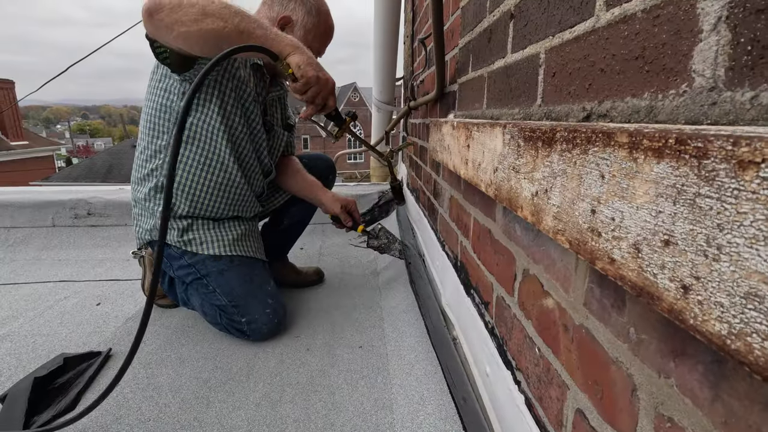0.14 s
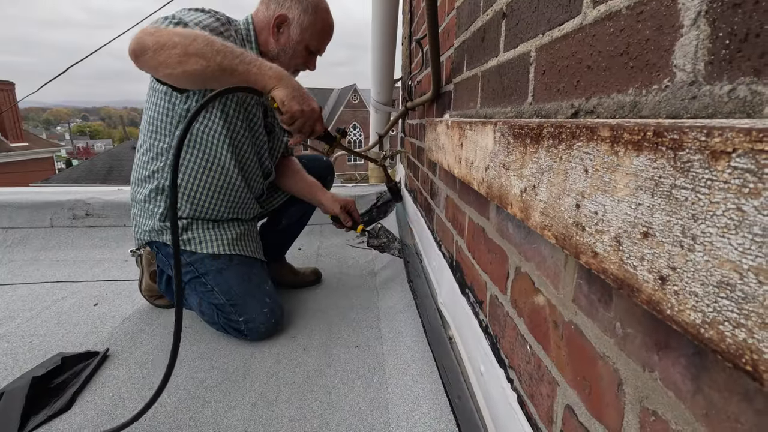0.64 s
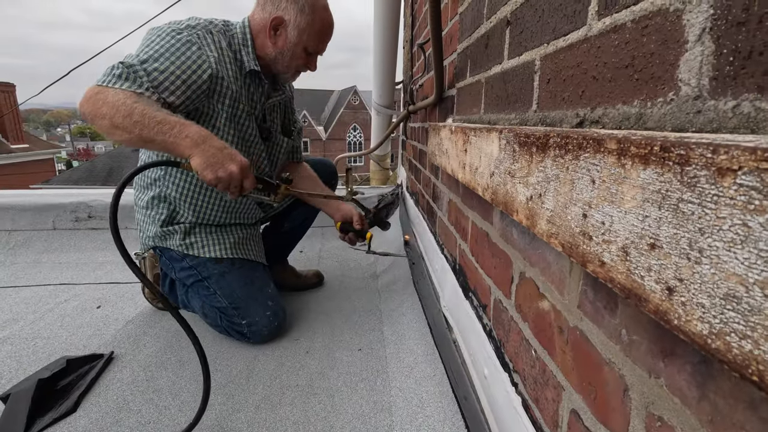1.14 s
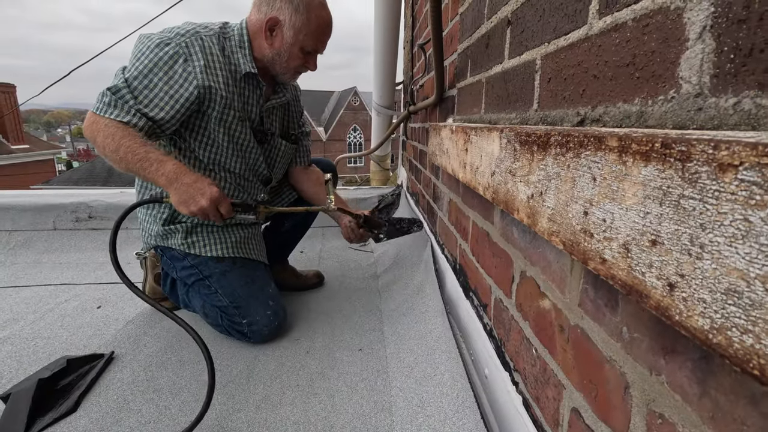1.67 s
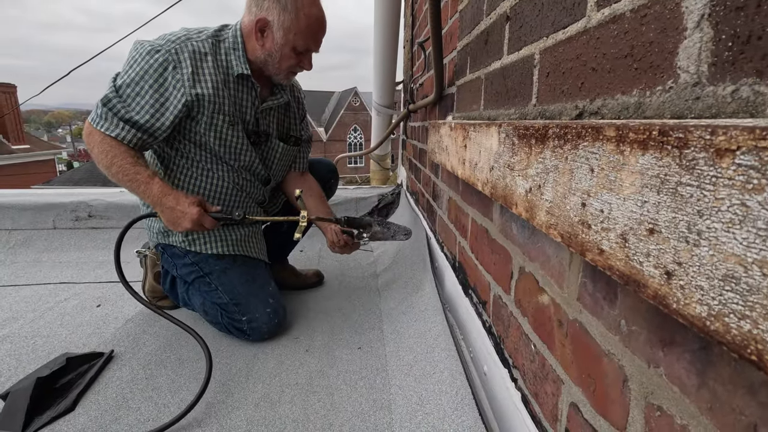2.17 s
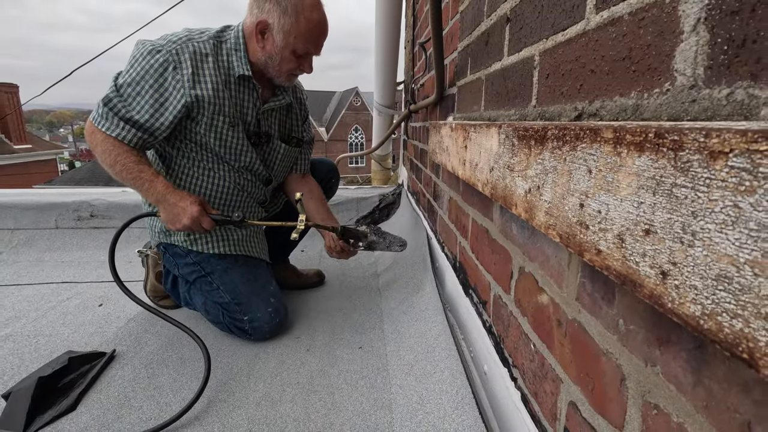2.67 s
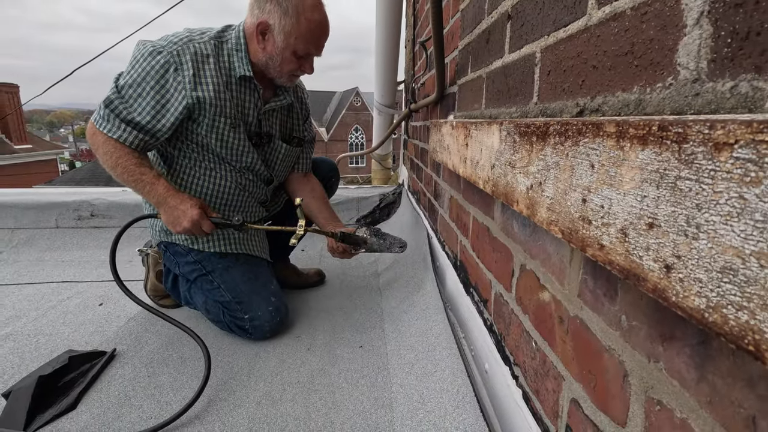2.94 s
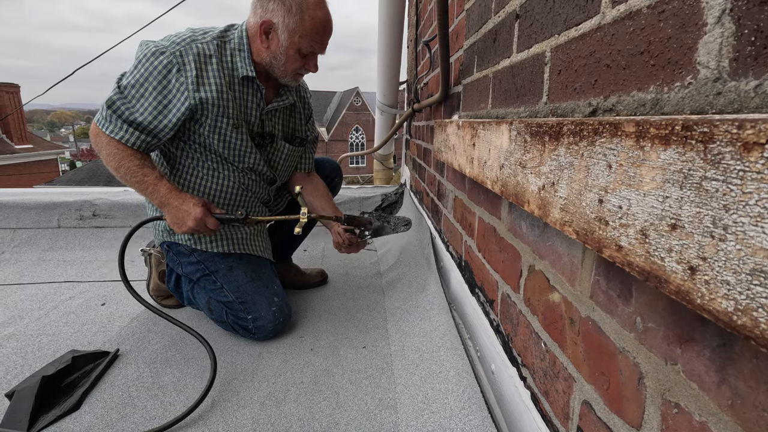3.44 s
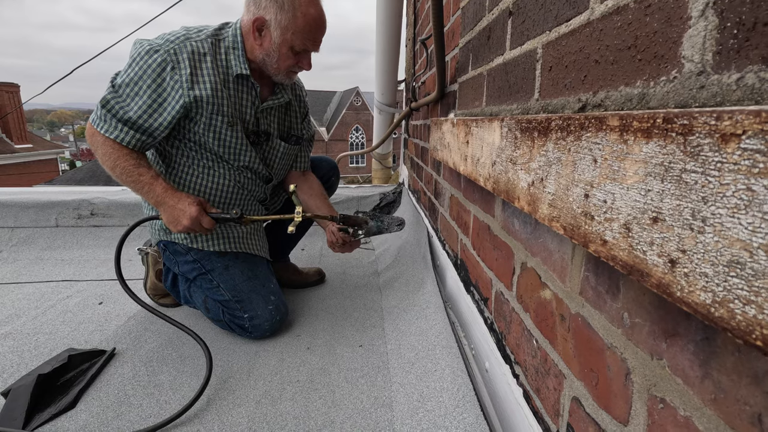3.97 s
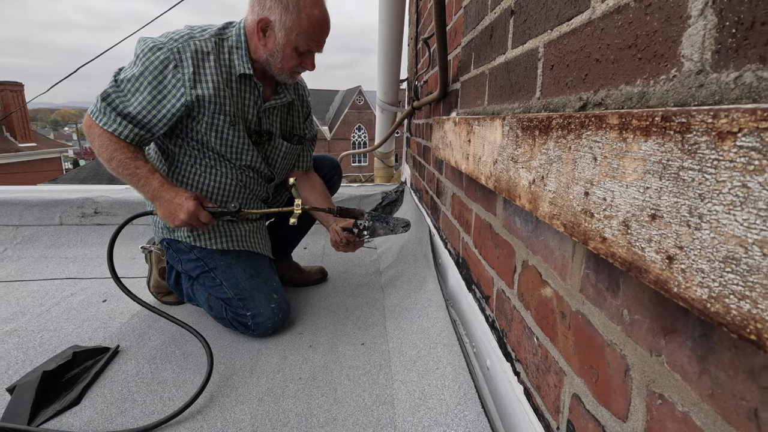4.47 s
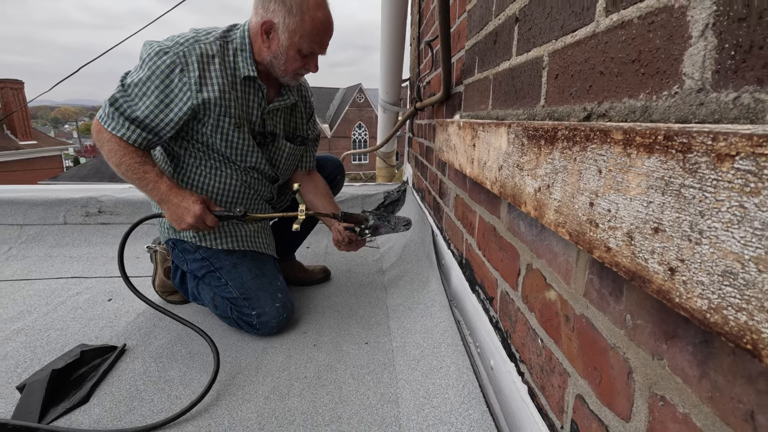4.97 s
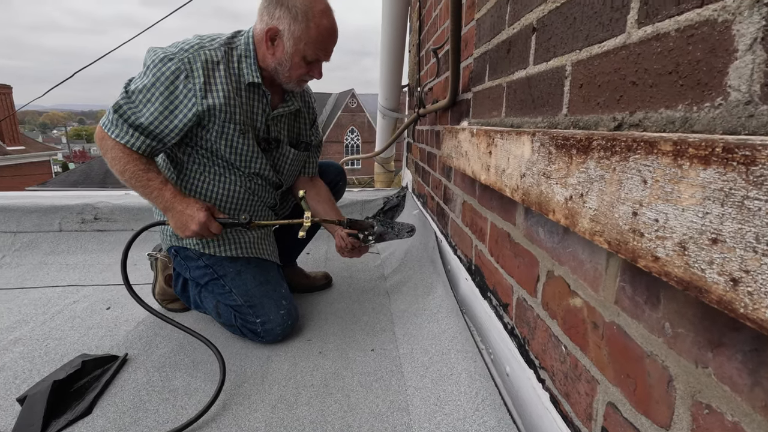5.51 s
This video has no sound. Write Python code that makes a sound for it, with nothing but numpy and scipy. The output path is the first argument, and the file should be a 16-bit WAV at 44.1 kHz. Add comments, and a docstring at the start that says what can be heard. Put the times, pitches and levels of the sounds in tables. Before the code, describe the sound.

On an open roof beside brick, a gas torch blasts a dense, turbulent rush with little hiss on top. The lever is released and the roar sinks away to a faint flicker; light metallic ticks follow. At about 2.3 seconds it catches suddenly, with a low swell, and burns steadily with more airy hiss and brief spits. Two well-separated microphones place it nearer the right, with no long reverberation.

```python
"""Propane torch on a flat roof

A torch roars beside a brick wall; the lever is let go, a pilot flame idles, the lever is squeezed again.
Noise swelling with random eddies makes roar and jet hiss, ringing scratches the ticks, noise puffs the spits.
Two microphones more than a metre apart hear it, the right one nearer; wall, roof and worker throw
short echoes that change as the torch moves.
"""
import sys
import numpy as np
from scipy import signal
from scipy.fft import rfft, irfft, next_fast_len
from scipy.io import wavfile
from scipy.ndimage import uniform_filter1d, map_coordinates

SR = 44100
rng = np.random.default_rng(int(sys.argv[2]) if len(sys.argv) > 2 else 0)


def ratio(d):
    """dB to gain"""
    e = np.asarray(d, float) / 20
    return 10 ** e


def dump(signal):
    """Clip the signal to [-1, 1] and save it as 16-bit WAV at the path in sys.argv[1]."""
    limited = np.clip(np.atleast_2d(signal).T, -1, 1)
    pcm = np.round(limited * 32767).astype(np.int16)
    wavfile.write(sys.argv[1], SR, pcm)


N = 247837
SIZE = next_fast_len(N)
HZ = np.fft.rfftfreq(SIZE, 1 / SR)
TIME = np.arange(N) / SR
SPLIT_HZ = 6100  # roar below, hiss above


def evened(x):
    """Scales to rms 1."""
    return x / np.sqrt(np.mean(abs(x) ** 2) + 1e-20)


def read(points):
    """Reads a (frequency, value) curve at every spectrum bin, along log frequency."""
    f, value = np.transpose(points)
    return np.interp(np.log(HZ + 1), np.log(f + 1), value)


# Full flame as the torch swings down and turns: (time [s], left roar level [dB], right roar level [dB],
# left jet hiss level [dB], right jet hiss level [dB])
FULL_FLAME = [(0, -20.5, -13, -49, -43.5), (.2, -19.5, -12, -42, -42), (.45, -24, -12.5, -47, -37.5),
              (.62, -23, -13, -50, -45.5), (0.901, -21, -13, -49, -42.5), (1.3, -19.5, -13, -51.5, -42.5),
              (1.5, -19, -12.5, -55, -53), (2.3, -19.5, -13.5, -42, -40.5), (2.67, -18, -12, -36.5, -36.5),
              (3.1, -19, -13.5, -40.5, -39.5), (3.7, -18.5, -12, -38.5, -37), (4.1, -19, -13.5, -42.5, -45),
              (4.602, -18, -13.5, -43.5, -51), (4.88, -20.5, -16, -41, -43), (5.1, -19.5, -16, -42.5, -52),
              (5.62, -22, -18, -41, -53)]
# Pilot flame: (left roar level [dB], right roar level [dB], left hiss level [dB], right hiss level [dB])
PILOT_LEVELS = [-51.5, -46, -84, -78.5]
# Flame colour at the farther and the nearer microphone: (frequency [Hz], relative level per Hz [dB])
COLOUR_LEFT = [(25, -38), (50, -16), (90, -9), (150, 3), (260, 4), (430, 5.5), (700, -2), (1300, -9),
               (2100, -19), (3500, -20), (6500, -29), (9000, -24), (12000, -35.5), (14000, -34),
               (15600, -47)]
COLOUR_RIGHT = [(25, -13), (50, -52), (90, -11.5), (150, 0), (260, 0.5), (430, -0.5), (700, -4.5),
                (1300, -13.5), (2100, -19.5), (3500, -31.5), (6500, -37), (9000, -36), (12000, -42),
                (14000, -47), (15600, -66)]
# Aim at each microphone, a row per hold: (roar tilt [dB/octave], hiss tilt [dB/octave],
# boost of first, second and third tube mode [dB])
AIM_AT_LEFT = [(-1.3, 2, -1, 14, 1), (-0.5, 6, -3, 13, -6), (-0.7, -3, -8, 10.3, -16), (-3, 4, 2, 8, -3),
               (-0.4, 2.2, 5, 7.2, 1), (1.25, 11.5, 2, 6.1, 7), (0.54, 7.5, 2.5, 9.9, 0),
               (1.5, 6, 14, 10, 15.5)]
AIM_AT_RIGHT = [(0.78, 2, 8.5, 7.4, -6), (0.39, -10, 7, 7.4, 10), (0.012, -8, -1.5, 9.6, 4),
                (-0.79, -14, 3.5, 7.4, -38), (0.15, -2, 10.5, 4.2, 6), (0.67, 3, 6.5, 11.6, 0),
                (0.28, -1, 8.5, 10, 4), (1.46, 7, 10, 6.3, -9)]
# Echoes off wall, roof and worker: (delay raised [ms], gain raised [ratio], delay lowered [ms],
# gain lowered [ratio])
WALL_ROOF_LEFT = [(.35, -0.26, 0.28, -0.19), (.68, 0.28, 0.523, 0.1), (1.3, -0.01, 1.616, 0.13),
                  (1.92, -0.22, 1.82, -0.27), (2.59, -0.37, 2.51, -0.17), (3.2, -0.061, 3.32, -0.3),
                  (4.44, 0.28, 4.4, 0.067), (6.53, -0.38, 6.8, -0.21)]
# The same on the near side: (delay raised [ms], gain raised [ratio], delay halfway [ms],
# gain halfway [ratio], delay lowered [ms], gain lowered [ratio])
WALL_ROOF_RIGHT = [(.36, 0.89, 0.4, 0.5, 0.37, -0.16), (.68, 0.23, 0.67, 0.43, 0.772, 0.56),
                   (1.02, -0.22, 0.926, -0.051, .95, 0.04), (1.36, -0.12, 1.62, -0.27, 1.414, 0.28),
                   (2.15, -0.33, 2.2, -0.34, 1.764, -.14), (2.8, 0.2, 2.73, 0.29, 2.64, 0.1),
                   (3.5, -0.31, 3.7, -0.3, 3.9, 0.14), (3.85, -0.18, 4.2, -0.13, 4.47, -0.22),
                   (4.9, 0.23, 4.92, 0.057, 5.3, 0.13)]
SINK_BEND, CATCH_BEND = (1.9, 1.25), (3.5, 2.2)  # powers of time for (roar, hiss)
HISS_LEAD_S = 0.0064  # squeezed again, the gas hisses a moment before it roars


def flame():
    """Burning roar below, hiss of the gas jet above, each following the lever down to the pilot and back."""
    s, *columns = np.transpose(FULL_FLAME)
    full_db = np.array([np.interp(TIME, s, column) for column in columns])
    roar_left, roar_right = turbulence(slow_db=0.65, slow_hz=1.4, fast_db=1.67, fast_hz=120, eddy_hz=1330)
    hiss_left, hiss_right = turbulence(slow_db=0.4, slow_hz=6, fast_db=1.2, fast_hz=90, eddy_hz=9500)
    left = held(roar_left, hiss_left, COLOUR_LEFT, AIM_AT_LEFT, WALL_ROOF_LEFT)
    right = held(roar_right, hiss_right, COLOUR_RIGHT, AIM_AT_RIGHT, WALL_ROOF_RIGHT)
    # the pilot flickers, its roar less than its hiss
    flicker_db = 2.5 * flutter(6)[:N] * np.array([[0.4], [0.4], [1], [1]])
    pilot_db = np.c_[PILOT_LEVELS] + flicker_db
    sunk = [lever(*bends) for bends in zip(SINK_BEND, CATCH_BEND, (0, HISS_LEAD_S))]
    sunk = np.repeat(sunk, 2, axis=0)
    gains = ratio(full_db + sunk * (pilot_db - full_db))
    return np.array([(gains[0::2] * left).sum(0), (gains[1::2] * right).sum(0)])


LET_GO_S, SINKING_S = 1.484, 0.31  # lever released, time until only the pilot burns
SQUEEZE_S, CATCHING_S = 2.281, 0.043  # lever squeezed, time until the flame is full


def lever(sink_bend, catch_bend, lead_s=0):
    """How far the flame has sunk to the pilot, 0-1, as the lever shuts and reopens the gas."""
    sinking = np.clip((TIME - LET_GO_S) / SINKING_S, 0, 1) ** sink_bend
    waiting = np.clip(1 - (TIME + lead_s - SQUEEZE_S) / CATCHING_S, 0, 1) ** catch_bend
    return sinking * waiting


# Ways of holding the torch: (start [s], end [s], lowered [0-1], tube pitch [ratio], left side lag [ms])
HOLD_POSES = [(.1, .35, 0.03, 1.05, 3.63), (.55, .8, 0, 1.003, 3.62), (1.0, 1.15, 0.56, 0.95, 3.7),
              (1.35, 1.52, 0.57, 0.91, 3.77), (1.78, 2.25, 0.82, 1.04, 3.67),
              (2.32, 3.4, 0.86, 0.983, 3.68), (3.6, 4.6, 0.9, .97, 3.58), (5.0, 5.5, 1, 1.007, 3.63)]
# Upper roar against the rumble: (time [s], relative level [dB])
RUSH_BALANCE = [(0, -1.2), (.4, 3.5), (.8, -1.2), (1.3, 1.8), (2.0, -2), (2.5, 0), (3.2, -1.7), (3.6, 1.5),
                (4.0, -1.5), (4.6, 0), (5.1, -2), (5.35, 2.5), (5.62, 0.5)]


def held(roar, hiss, colour, aims, echo_table):
    """Roar and hiss at one microphone, fading from hold to hold as the torch moves."""
    low = 1 / np.sqrt(1 + (HZ / SPLIT_HZ) ** 40)
    high = np.sqrt(1 - low ** 2)
    hold_s = np.ravel([hold[:2] for hold in HOLD_POSES])
    layers = np.zeros((2, N))
    for hold, aim, row in zip(HOLD_POSES, aims, np.eye(len(HOLD_POSES))):
        way = path(colour, hold, aim, echo_table)
        spectra = np.array([roar * evened(low * way), hiss * evened(high * way)])
        fade = np.interp(TIME, hold_s, np.repeat(row, 2))
        layers += fade * irfft(spectra, SIZE)[:, :N]
    burning, jet = layers
    return lit(burning), patchy(jet, 2.96)


def lit(burning):
    """Balances rumble and upper roar while the flame dies, idles and lights again with a whoomp."""
    rumble = irfft(rfft(burning, SIZE) / (1 + (HZ / 1200) ** 4), SIZE)[:N]
    rush = burning - rumble
    # the slowing jet loses its upper roar first
    dying = np.sin(np.pi * np.clip((TIME - LET_GO_S) / (1.3 * SINKING_S), 0, 1)) ** 2
    rush_db = np.interp(TIME, *np.transpose(RUSH_BALANCE)) - 6.5 * dying
    # the gathered gas lights: a swell of the rumble
    after = TIME - 2.35
    whoomp_db = 4.5 * np.exp(-(after / np.where(after < 0, 0.022, 0.055)) ** 2)  # rise and fade [s]
    # the small flame loses three quarters of its depth below 96 Hz
    depth = irfft(rfft(rumble, SIZE) / (1 + (HZ / 96) ** 4), SIZE)[:N]
    rumble = rumble - 0.75 * lever(SINK_BEND[0], CATCH_BEND[0]) * depth
    return evened(ratio(whoomp_db) * rumble + ratio(rush_db) * patchy(rush, 1.8) * rush.std())


# Burner tube modes: (frequency [Hz], half width [Hz])
TUBE_MODES = [(2650, 257), (5240, 600), (7780, 140)]


def path(colour, hold, aim, echo_table):
    """Spectrum of flame colour, tube modes and echoes for one way of holding the torch."""
    lowered, tube_pitch = hold[2:4]
    roar_tilt_db, hiss_tilt_db, *modes_db = aim
    db = read(colour) + roar_tilt_db * np.log2(1 + np.minimum(HZ, SPLIT_HZ) / 500)
    db += hiss_tilt_db * np.log2(np.maximum(HZ / SPLIT_HZ, 1))
    for (hz, width), peak_db in zip(TUBE_MODES, modes_db):
        db += peak_db / (1 + ((HZ - tube_pitch * hz) / width) ** 2)
    coarse = HZ[::25]
    echoes = np.zeros(len(coarse), complex)
    for row in echo_table:
        heights = np.linspace(0, 1, len(row) // 2)  # raised to lowered
        ms = np.interp(lowered, heights, row[0::2])
        gain = np.interp(lowered, heights, row[1::2])
        echoes += gain * np.exp(-2j * np.pi * coarse * ms / 1000)
    dull = 1 / (1 + (HZ / 5000) ** 2)  # rough brick and clothing scatter the treble
    return ratio(db) * (1 + dull * np.interp(HZ, coarse, echoes))


# Likeness of the two sides: (frequency [Hz], share of the sound common to both [0-1])
SIDES_ALIKE = [(40, .55), (90, .99), (300, .96), (1000, .9), (3000, .7), (6000, .45), (15000, .2)]


def turbulence(slow_db, slow_hz, fast_db, fast_hz, eddy_hz):
    """Noise whose strength lurches with the eddies, as left and right spectra that are partly alike."""
    noise = rng.standard_normal((2, SIZE))
    swell_db = slow_db * flutter(slow_hz)
    large = rfft(noise * ratio(swell_db + fast_db * flutter(fast_hz)))
    small = rfft(noise * ratio(swell_db + fast_db * flutter(fast_hz)))
    below = 1 / (1 + (HZ / eddy_hz) ** 4)  # large eddies sound low, small ones high
    right, other = below * large + (1 - below) * small
    share = read(SIDES_ALIKE)
    return share * right + np.sqrt(1 - share ** 2) * other, right


def flutter(top_hz):
    """Random wobble of rms 1, mostly slower than top_hz."""
    shape = HZ / (HZ + 2) / (1 + (HZ / top_hz) ** 2)
    return evened(irfft(rfft(rng.standard_normal(SIZE)) * shape, SIZE))


def patchy(x, patchy_db):
    """Makes a sound flicker in small patches of pitch and time, then scales it to rms 1."""
    z = signal.stft(x, nperseg=512, noverlap=384)[2]
    patches = uniform_filter1d(rng.standard_normal(z.shape), 10, 0)  # across pitch
    patches = uniform_filter1d(patches, 18, 1)  # across time
    flickering = z * ratio(patchy_db * evened(patches))
    return evened(signal.istft(flickering, nperseg=512, noverlap=384)[1][:N])


# Small ticks of lever and brass: (time [s], peak level [dB], left minus right [dB])
LEVER_TICKS = [(1.8431, -59, -9.0), (1.8945, -48, -2), (1.987, -46.5, 0), (2.0591, -50, -4),
               (2.0945, -45, -1.0), (2.153, -55, -5), (2.2317, -45.5, -8), (2.2631, -40, -14)]
# Ringing of the brass: (frequency [Hz], relative level [dB], 60 dB decay time [s])
BRASS_MODES = [(1440, 5, 0.018), (2790, 6, 0.0093), (3920, -11, 0.009), (5660, -7, 0.019),
               (8700, -15, 0.013)]


def ticks():
    """A short soft scratch rings the brass, each mode a decaying sine."""
    t = np.arange(3000) / SR
    ring = sum(ratio(db - 60 * t / t60) * np.sin(2 * np.pi * hz * t) for hz, db, t60 in BRASS_MODES)
    scratches = rng.standard_normal((len(LEVER_TICKS), 3000)) * t * np.exp(-t / 0.0053)
    return place(LEVER_TICKS, signal.fftconvolve(scratches, ring[None], axes=1))


# Brief spits of the jet: (time [s], peak level [dB], left minus right [dB])
JET_SPITS = [(3.2126, -29, -1.0), (4.3199, -29, -10), (5.0103, -51, -10)]


def spits():
    """Short puffs of high hiss: noise that swells and fades, kept to a treble band."""
    t = np.arange(4000) / SR
    puffs = rng.standard_normal((len(JET_SPITS), 4000)) * t * np.exp(-t / 0.014)
    band = signal.butter(3, [7000, 13500], "band", fs=SR, output="sos")
    return place(JET_SPITS, signal.sosfilt(band, puffs))


def place(events, sounds):
    """Starts one sound at each event, its peak set to the level and split by the balance."""
    out = np.zeros((2, N))
    for (s, db, pan_db), sound in zip(events, sounds):
        at = round(s * SR)
        gains = ratio([[db + pan_db / 2], [db - pan_db / 2]])
        out[:, at:at + len(sound)] += gains * sound / abs(sound).max()
    return out


def scene():
    """All sources; the farther left side hears them later, by a lag that drifts with the hold."""
    left, right = flame() + ticks() + spits()
    hold_s = np.ravel([hold[:2] for hold in HOLD_POSES])
    lag_ms = np.interp(TIME, hold_s, np.repeat([hold[4] for hold in HOLD_POSES], 2))
    heard_at = np.arange(N) - lag_ms * SR / 1000
    return np.array([map_coordinates(left, [heard_at], order=3, mode="mirror"), right])


def low_pass(x):
    """Removes everything above the highest recorded frequency."""
    return signal.sosfilt(signal.butter(12, 15610, fs=SR, output="sos"), x)


def record(dry):
    """The microphones cut the deep bass; the loudest peaks round off under full scale."""
    bass_cut = signal.butter(2, 65, "high", fs=SR, output="sos")
    heard = signal.sosfilt(bass_cut, dry)
    mix = heard / (1 + heard ** 8) ** (1 / 8)
    return low_pass(mix)


dry = scene()
out = record(dry)
dump(out)
```